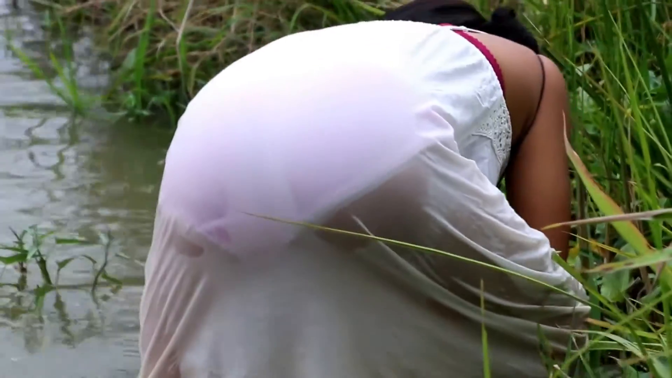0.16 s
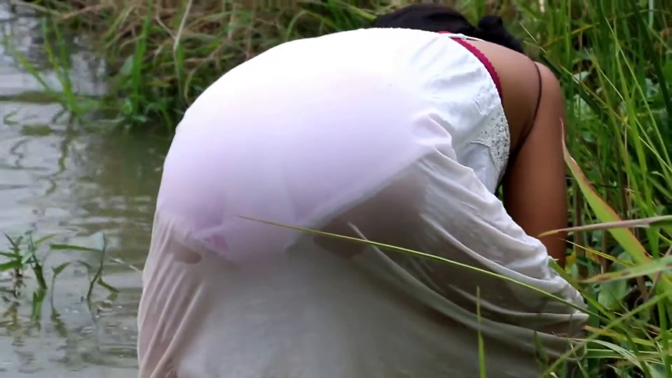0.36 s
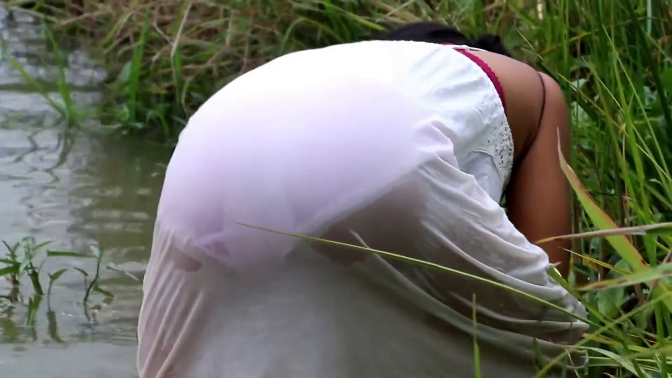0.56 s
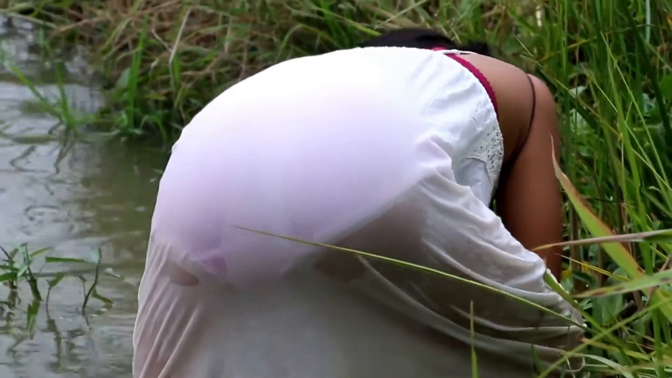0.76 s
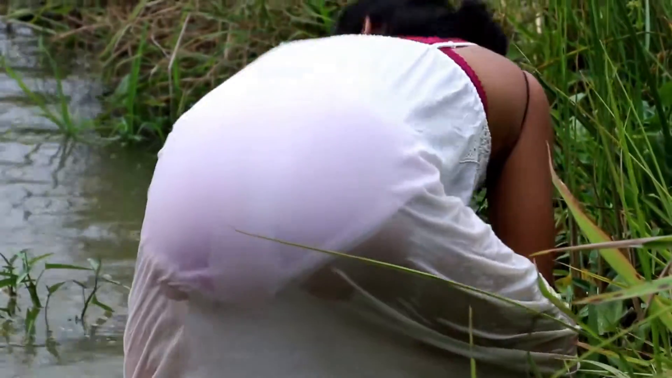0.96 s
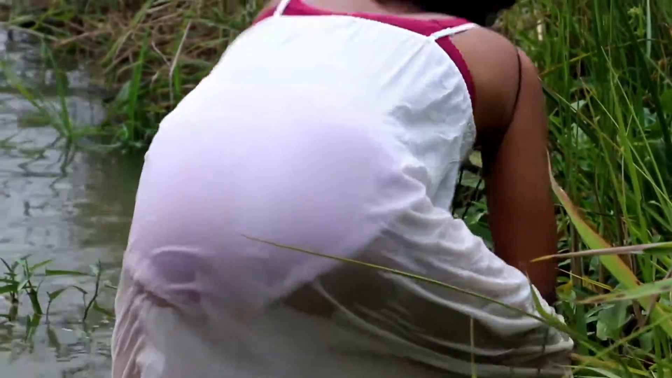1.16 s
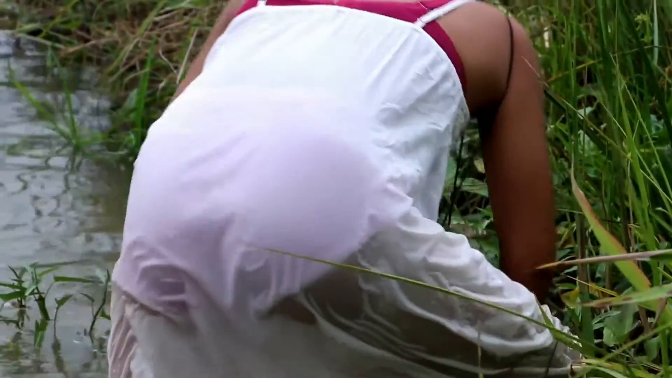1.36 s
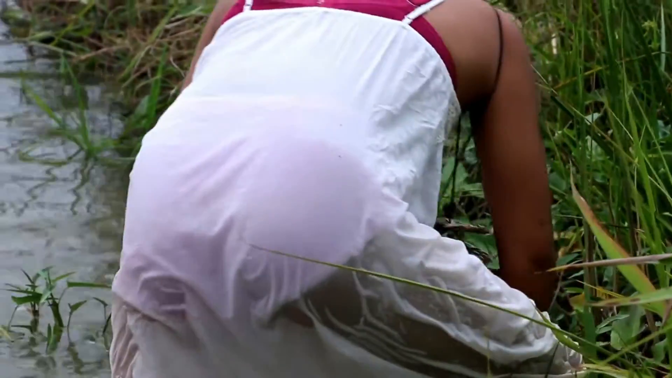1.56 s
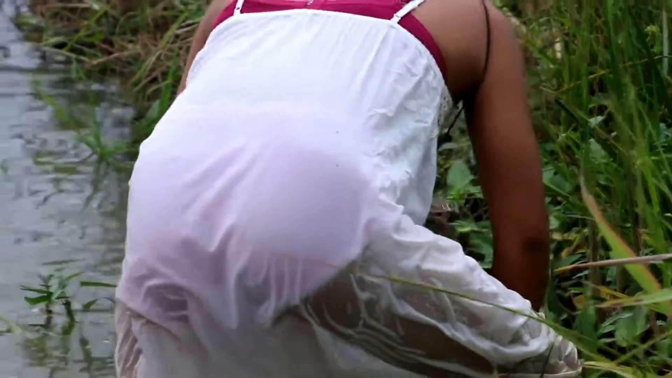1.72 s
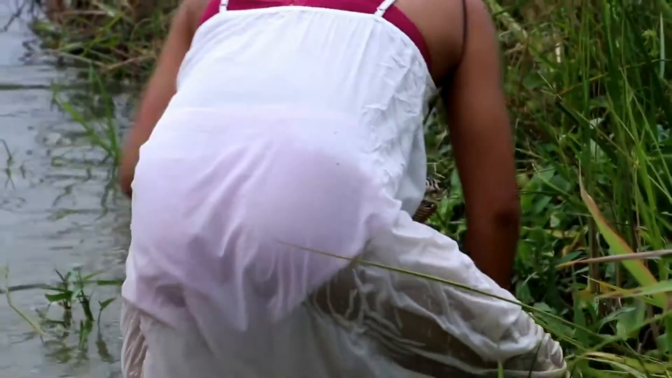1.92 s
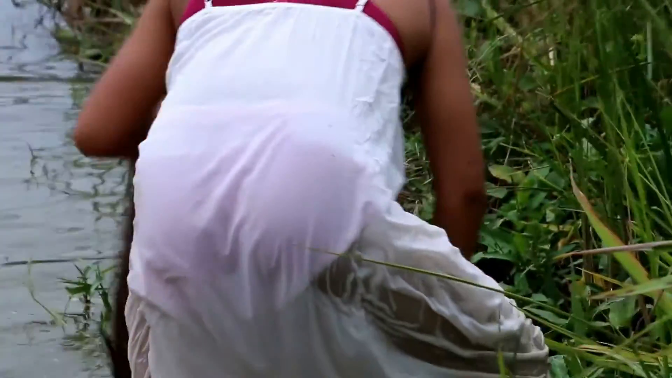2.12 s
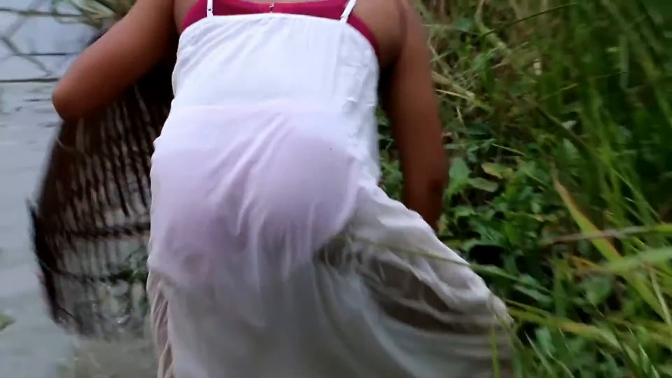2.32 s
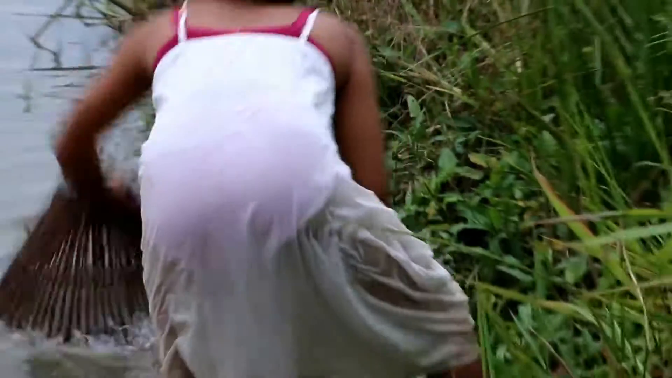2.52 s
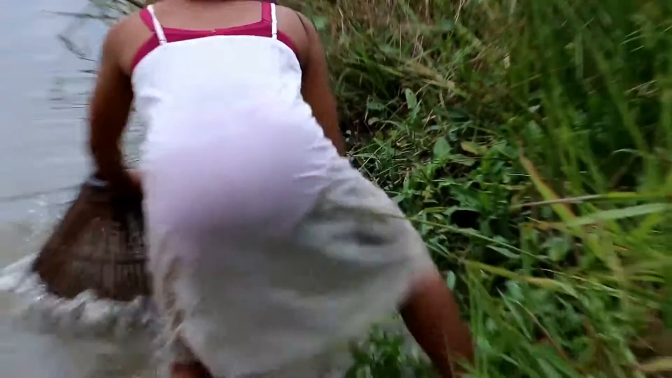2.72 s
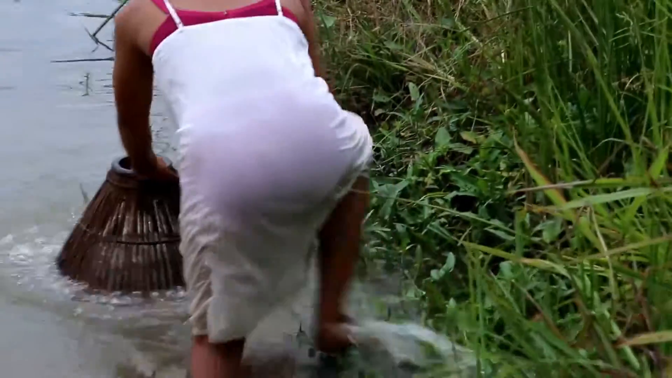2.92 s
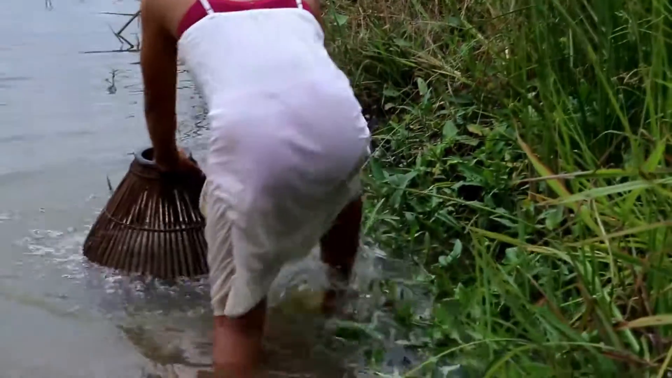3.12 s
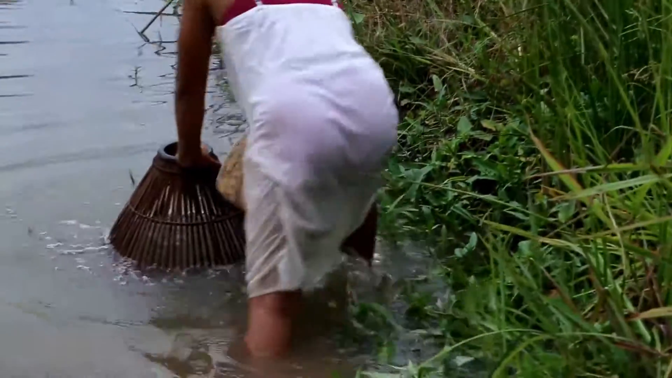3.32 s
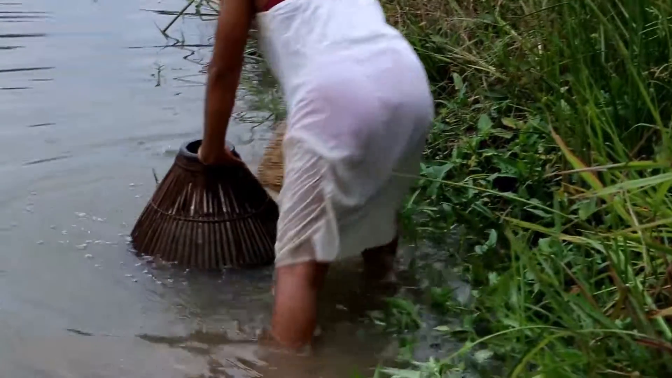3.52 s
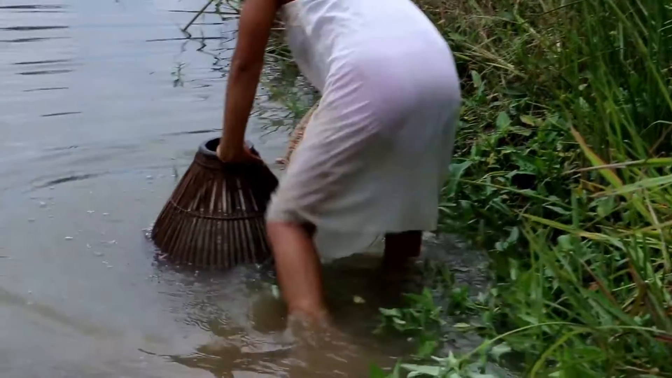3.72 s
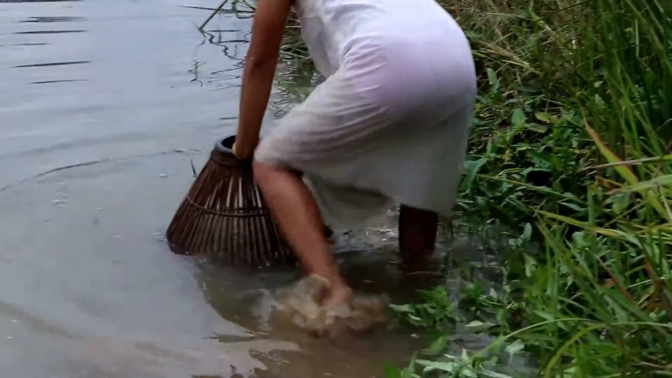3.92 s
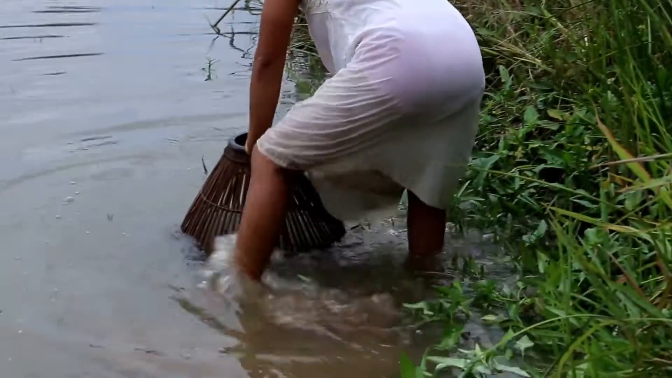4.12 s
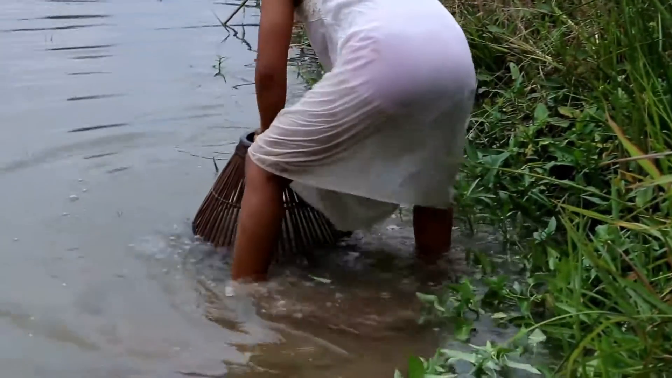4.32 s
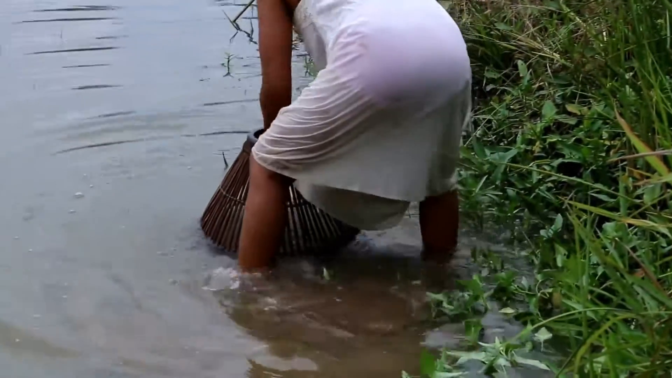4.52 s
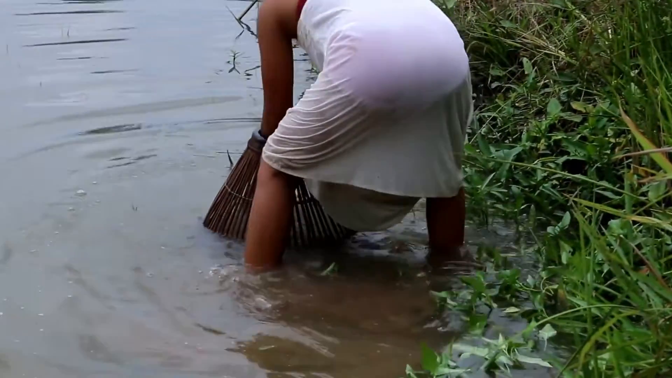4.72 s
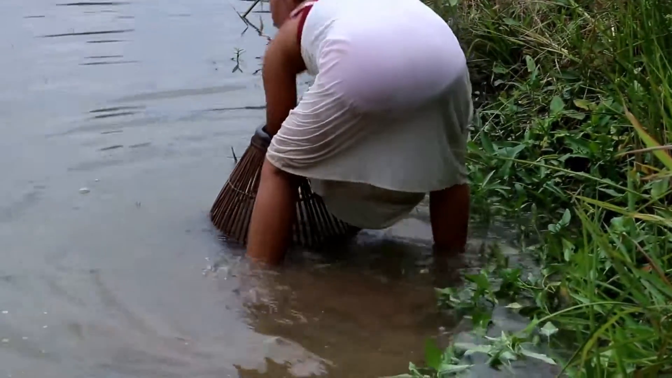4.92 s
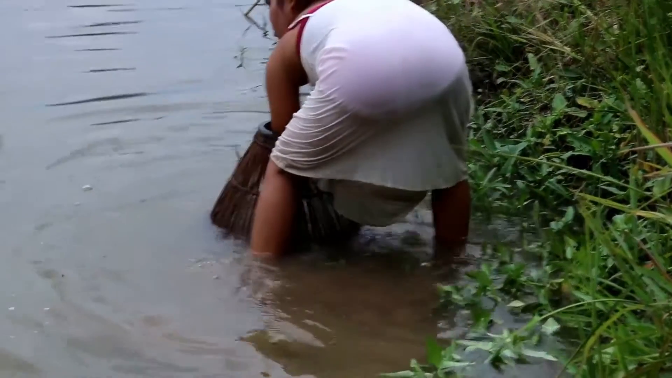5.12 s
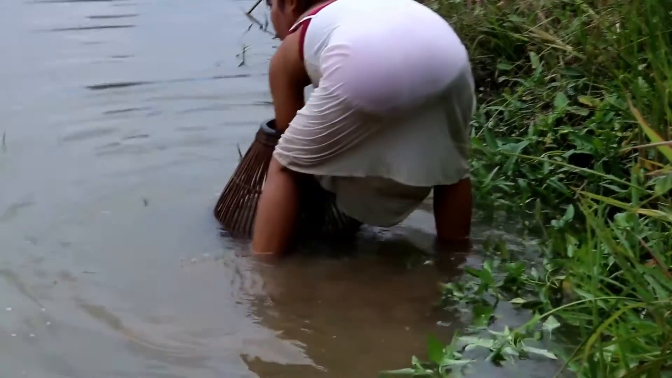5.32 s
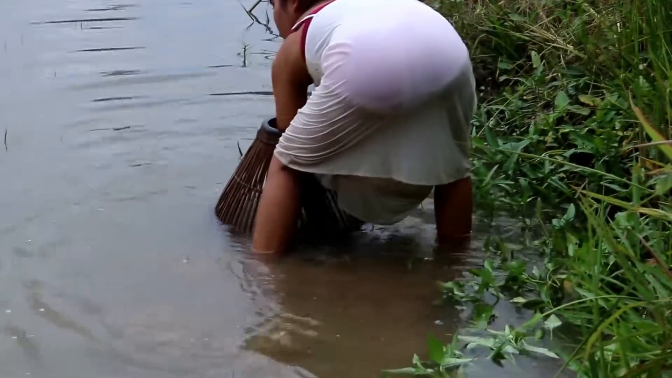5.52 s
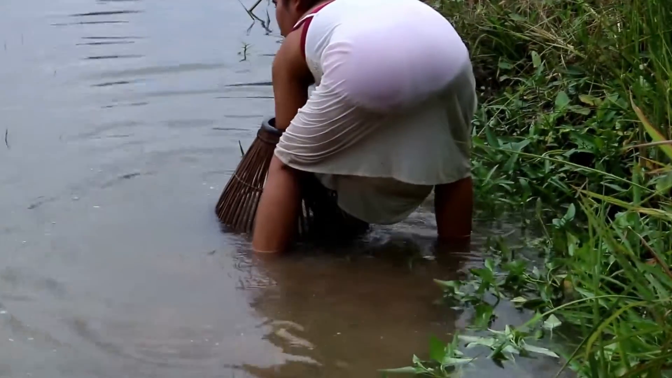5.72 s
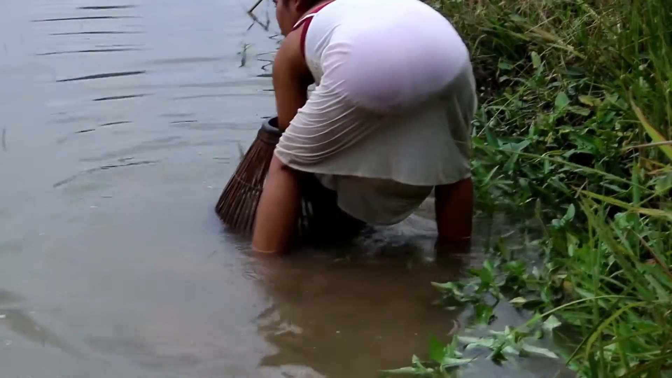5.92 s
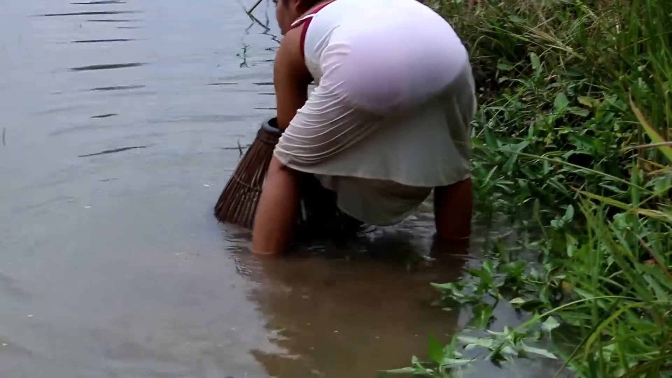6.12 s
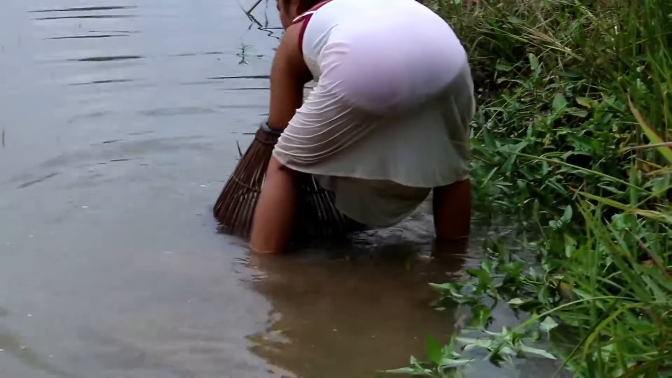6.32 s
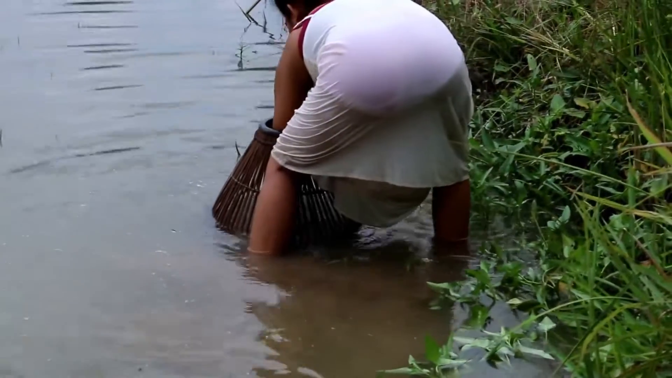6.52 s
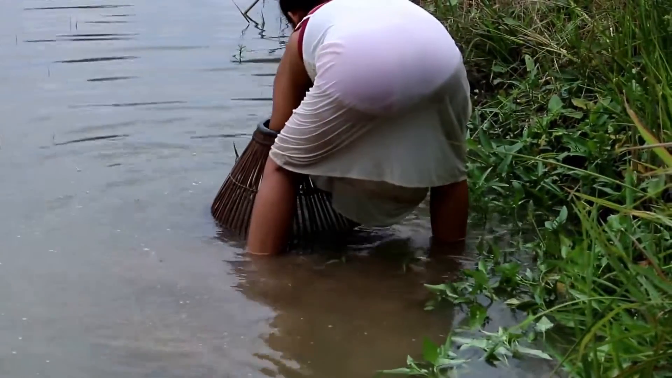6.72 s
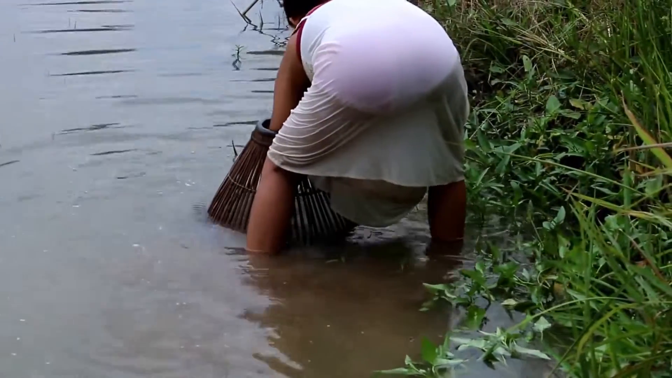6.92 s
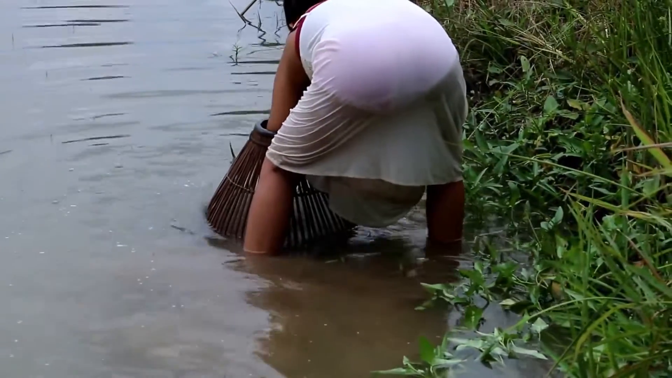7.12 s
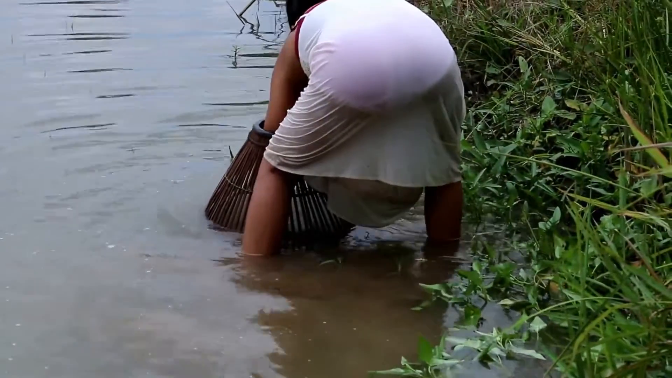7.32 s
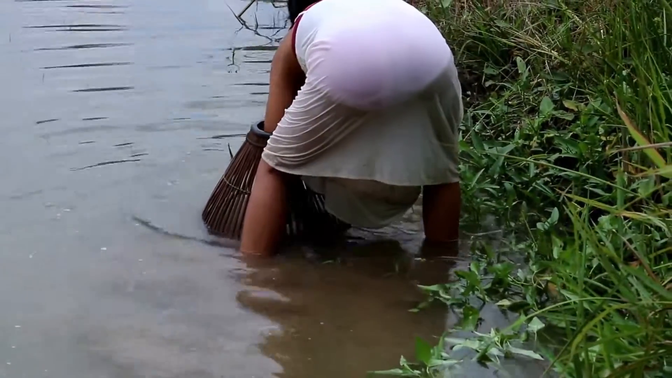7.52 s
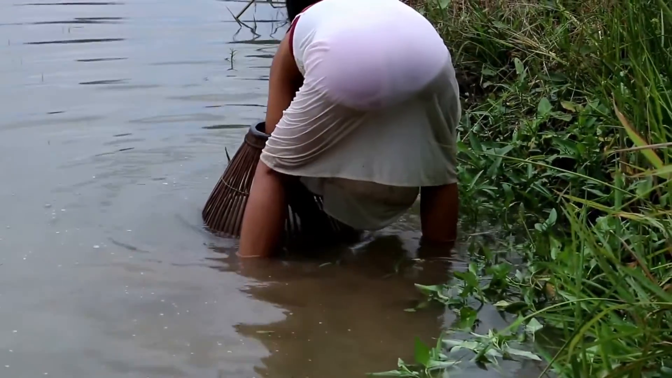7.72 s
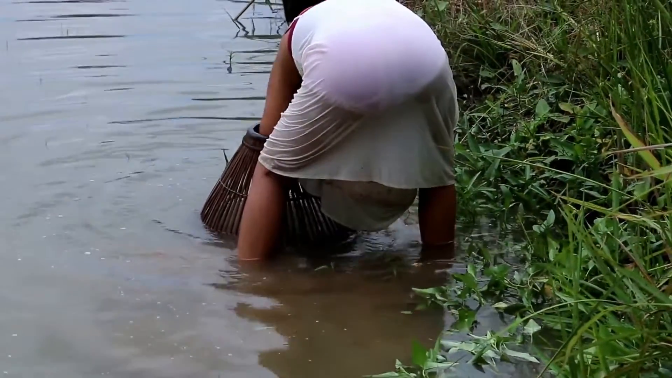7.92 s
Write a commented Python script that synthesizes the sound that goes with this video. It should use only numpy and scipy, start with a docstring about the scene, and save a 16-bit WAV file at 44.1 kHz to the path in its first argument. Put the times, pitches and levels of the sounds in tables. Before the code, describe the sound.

Someone wading at a grassy pond edge plunges a bamboo trap with splashes and a sharp wet slap, then quiet drips, over distant engine hum.

```python
"""First a bird scolds over far engines and a bush cricket's buzz, and single drips fall.
Then someone wading a grassy pond bank plunges a bamboo fish trap, takes two steps and gropes inside it.
Splashes are swarms of ringing bubbles with rushing noise; larger bubbles, gulps and clicks are placed singly.
Wind is low noise at each microphone port, engines are sine tones, and bird calls are sliding tones and rasps.
The bank answers the water and animals with a short, fading noise echo."""
import sys
import numpy as np
from scipy import signal
from scipy.fft import rfft, irfft, next_fast_len
from scipy.io import wavfile
from scipy.ndimage import uniform_filter1d, map_coordinates

SR = 44100
rng = np.random.default_rng(int(sys.argv[2]) if len(sys.argv) > 2 else 0)


def int16_out(signal):
    """Quantize to a 16-bit WAV file."""
    q = np.round(np.clip(np.atleast_2d(signal).T, -1, 1) * 32767)
    wavfile.write(sys.argv[1], SR, q.astype(np.int16))


N = 351036

# Sound levels are relative: panning, mixing and echo come later.
# A "_COLOUR" table shapes noise or bubble strength: frequency_hz, level_db (relative).
# A t60_s is the time a sound takes to fall by 60 dB.

# distant rumble and grass: colour; then time_s, level_db; then frequency_hz, left_right_likeness (0 to 1)
AIR_COLOUR = [(20, -19), (35, -17), (58, -3.5), (91, -2), (150, -1), (253, -10.5), (457, -21.5),
              (900, -22.5), (1600, -28), (2900, -28), (6050, -35), (9300, -31.5), (12000, -42.5),
              (15500, -46.5)]
AIR_LEVEL = [(0, -43.5), (5, -44.5), (7.96, -46.5)]
AIR_ALIKE = [(130, 0.96), (640, 0.7), (1400, 0.7), (3100, 0.037)]
# thin insect chorus
CHORUS_COLOUR = [(6500, -44), (7900, 14), (8700, 3), (9500, 13), (10400, -25), (13000, -26)]

# pump: time_s, firing_hz, level_db; its tones: multiple, level_db
PUMP = [(0, 86.7, -38), (2, 84.6, -41), (5.5, 86.72, -40.5), (7, 86.66, -41), (7.96, 87.2, -44.5)]
PUMP_ORDERS = [(1, 1.5), (2, -7.5), (3, -35), (4, -34.5)]
# slower far engine: time_s, shaft_hz, level_db; its tones: multiple, level_db
FAR_ENGINE = [(0, 34.9, -38.5), (2, 35.48, -48.5), (5, 34.7, -48), (7.96, 34.6, -48.5)]
FAR_ORDERS = [(4.5, -22.5), (5, -12), (6, -17.5), (7, -22.5), (8, -17.5), (9, -21.5)]

# breeze at the exposed left port: time_s, level_db
BREEZE = [(0, -52), (2.0, -38), (2.28, -23), (3.2, -27), (3.48, -33), (3.7, -21), (4.12, -23),
          (4.22, -29.5), (5.3, -32), (5.9, -43.5), (7.96, -58)]
SHELTER_DB = -9  # the right port lies in the lee
# puffs on the breeze: peak_s, length_s, level_db at the nearer port, left_minus_right_db
PUFFS = [(0.58, 0.038, -26, 17.5), (0.854, 0.11, -25.5, 26), (1.213, 0.021, -24, 22),
         (1.43, 0.091, -24.5, -22), (1.542, 0.024, -20.5, 14), (1.643, 0.099, -23.5, 1.5),
         (2.116, 0.11, -21.5, 7), (2.484, 0.17, -18.5, 27), (2.764, 0.061, -19.5, 22),
         (3.016, 0.051, -16, 5), (3.141, 0.19, -15.5, 29), (3.249, 0.064, -20.5, -19),
         (3.405, 0.018, -18.5, 7), (3.61, 0.15, -19.5, 11), (4, 0.047, -23, 24), (4.173, 0.045, -21, -22),
         (4.313, 0.054, -18.5, 24), (4.427, 0.15, -24, 1.5), (4.586, 0.085, -25, 3),
         (4.882, 0.11, -19.5, -1), (4.97, 0.02, -18, 3.5), (5.094, 0.076, -26, -22),
         (5.294, 0.059, -23.5, 25), (5.435, 0.094, -28.5, 20), (5.599, 0.046, -23.5, 11),
         (6.607, 0.085, -24.5, -9)]
PUFF_EDGE_DB = 7.5  # how far a puff has fallen at either end of its length
# low buffeting and smaller, brighter eddies
BUFFET_COLOUR = [(20, -15), (50, -5.5), (100, 4), (160, -1.5), (240, -14.5), (350, -34), (500, -39),
                 (900, -64), (2000, -100)]
EDDIES_COLOUR = [(80, -38), (180, 8), (300, -3), (420, -12.5), (600, -23), (1200, -42), (3000, -71)]
# sudden eddies thump the left port: start_s, level_db, pitch_hz
THUMPS = [(2.479, 1.5, 236), (2.569, -2.5, 262), (2.597, -7, 270), (3.124, 4.5, 302), (3.407, -14, 256),
          (3.606, 5, 262), (4.32, -2, 239)]

# bush cricket buzzes: start_s, end_s, level_db
BUZZES = [(-.15, 0.85, -67), (4.4, 5.4, -65.5), (6.9, 7.917, -66.5)]
CHIRP_SCATTER_HZ = 170  # size of the cricket's random pitch changes

# a bird's dry scolding: start_s, length_s, level_db
CHACKS = [(0.021, 0.022, -34.5), (0.105, 0.011, -39), (0.157, 0.0081, -36.5), (0.177, 0.0094, -40),
          (.3, 0.023, -35.5), (0.386, 0.009, -37.5), (.439, 0.0092, -39), (0.559, 0.022, -35),
          (0.645, 0.01, -40), (0.7, 0.0072, -38.5)]
CHACK_ATTACK_S, CHACK_RELEASE_S = .001, .006
RASP_COLOUR = [(1200, -28.5), (1800, -3.5), (2400, 1.5), (2700, 7), (3100, 5), (3600, -9.5), (4400, -10.5),
               (5200, -18.5), (8000, -47.5)]
# a run of short falling notes: start_s, start_hz, level_db
NOTES = [(1.436, 3100, -50), (1.742, 3060, -49.5), (2.01, 3030, -50), (2.205, 3050, -47),
         (2.399, 3070, -47), (3.567, 3740, -53), (3.802, 3760, -48.5), (4.027, 3700, -47),
         (4.222, 3540, -48), (4.424, 3520, -49), (4.645, 3430, -48.5), (4.848, 3400, -48.5),
         (5.055, 3390, -49.5), (5.276, 3380, -52.5), (5.473, 3380, -51), (5.697, 3350, -53)]
NOTE_S, NOTE_FALL, NOTE_BLUR = .052, .085, .7  # length, share of pitch lost, unsteadiness in radians
UNDERTONE, UNDERTONE_DB = .823, -8  # weaker partial below each note: pitch ratio, level
# lone slurred whistles: start_s, length_s, start_hz, end_hz, arch_height_hz, blur_radians, level_db
WHISTLES = [(4.552, .045, 3600, 3650, 100, 2, -51), (5.525, .135, 3600, 3450, 30, .6, -53),
            (5.512, .11, 3850, 3750, 290, .7, -54.5), (6.092, 0.08, 4100, 3700, 950, 2, -52),
            (6.08, .06, 3400, 3600, 350, 3, -56), (7.313, .075, 4250, 4100, 150, 3, -57),
            (7.34, 0.06, 3300, 3250, 0, 1.4, -55), (7.454, .095, 4000, 4050, 140, .6, -57),
            (7.555, .055, 3950, 3680, -30, .5, -53.5)]
# partials of one nasal chirp: multiple, level_db
CHIRP = [(1, 3), (2, 7), (3, -5.5)]

# echo life off the grassy bank: frequency_hz, t60_s
BANK = [(200, 0.0069), (2000, 0.16), (12000, 0.17)]
WATER_ECHO_DB, CALL_ECHO_DB, BUZZ_ECHO_DB = -9.5, -7, 3.5

# drops off the wet trap and clothes click on the surface: start_s, peak_db
CLICKS = [(1.885, -42), (1.98, -42), (4.465, -35), (4.488, -33), (4.844, -38), (4.865, -35), (5.04, -40),
          (5.257, -37), (5.75, -34), (5.788, -37), (6.701, -38), (6.79, -36), (7.061, -37), (7.494, -33),
          (7.66, -40), (7.696, -38)]
CLICK_T60_S = .012
TICKS_DB = -75  # stray droplets
TICKS_COLOUR = [(3000, 6), (9000, 1), (12000, 0), (15000, -12)]

# small drips: time_s, level_db
TRICKLE = [(0, -66), (2.5, -60), (3.3, -54), (3.7, -61), (4.4, -58), (5.4, -62), (6.3, -64), (7.1, -61),
           (7.96, -60)]
DRIPS_COLOUR = [(900, -11), (2200, -1.5), (3300, -4), (4500, -10), (7000, -19), (12000, -25)]
# soft gurgling under the small drips
GURGLE_DB = 1.5  # relative to the drips
GURGLES_COLOUR = [(500, -10), (900, -8.5), (1500, 2), (2300, -4.5), (3500, -3.5), (6000, -15)]

# cavities fill and their note slides: start_s, length_s, start_hz, end_hz, level_db
GULPS = [(3.424, 0.031, 774, 1390, -31.5), (3.604, 0.055, 500, 696, -42), (3.677, 0.036, 870, 1210, -46),
         (3.923, 0.033, 1100, 960, -43), (3.979, 0.033, 734, 900, -41), (6.45, 0.026, 515, 700, -46.5),
         (6.492, 0.047, 604, 830, -51), (6.714, 0.024, 1220, 1650, -46), (7.055, 0.039, 678, 900, -42),
         (7.189, 0.043, 660, 840, -41.5), (7.671, 0.054, 616, 1150, -41.5), (7.814, 0.025, 853, 1052, -44),
         (7.904, 0.066, 836, 910, -46)]
GULP_BLUR = .8  # unsteadiness of phase, radians

# single large bubbles and drips: start_s, level_db, pitch_hz
PLOPS = [(0.079, -32.5, 990), (0.521, -33.5, 1644), (0.746, -34, 1575), (0.804, -38, 1510),
         (0.835, -40, 1240), (0.867, -36, 900), (.9, -38, 2010), (.914, -36, 1550), (1.162, -35.5, 1360),
         (1.178, -39, 1900), (1.241, -41, 2020), (1.389, -35, 1200), (1.579, -34, 1800), (1.594, -33, 1000),
         (1.689, -38, 1190), (1.801, -37, 2100), (1.931, -38, 1500), (2.065, -33.5, 2070),
         (2.163, -30, 705), (2.173, -35.5, 2350), (2.443, -35, 1430), (2.606, -16, 820), (2.617, -24, 910),
         (2.668, -23, 674), (2.674, -24, 1930), (2.711, -34, 1190), (2.857, -19, 1220), (2.859, -27, 3200),
         (2.892, -23.5, 710), (2.891, -23, 1890), (2.984, -28, 4170), (3.007, -27, 2400),
         (3.011, -20.5, 1285), (3.072, -8.5, 807), (3.145, -26, 2050), (3.155, -27, 1840),
         (3.219, -16.5, 960), (3.428, -25.5, 926), (3.726, -37, 1000), (3.777, -38, 2080),
         (3.917, -24.5, 1096), (3.932, -27, 840), (3.944, -31, 2160), (4.004, -29, 670), (4.034, -29, 1830),
         (4.082, -26.5, 1770), (4.094, -22, 600), (4.096, -30, 1700), (4.11, -31, 740), (4.153, -28, 3040),
         (4.198, -26.5, 1030), (4.252, -22.5, 452), (4.254, -31, 1960), (4.322, -37, 1900),
         (4.671, -37, 2430), (4.699, -31, 820), (4.85, -32, 2750), (4.898, -30.5, 1520), (4.922, -38, 1900),
         (5.023, -30, 2940), (5.136, -37, 2460), (5.22, -38, 1930), (5.678, -29.5, 2030),
         (5.881, -34.5, 1000), (5.95, -27.5, 977), (6.12, -39, 2110), (6.17, -32, 1940),
         (6.255, -33.5, 3110), (6.328, -32, 976), (6.346, -36.5, 1630), (6.466, -39, 2180),
         (6.626, -42, 2140), (6.752, -39, 1510), (7.157, -39, 1260), (7.329, -32.5, 1020), (7.39, -41, 984),
         (7.489, -38, 1960), (7.517, -30, 2075), (7.54, -28.5, 1240), (7.563, -36.5, 960),
         (7.574, -30, 615), (7.684, -28, 740), (7.694, -25.5, 930), (7.704, -38.5, 1928),
         (7.802, -32.5, 1553), (7.882, -32.5, 2690), (7.946, -33.5, 910)]
PLOP_T60_S = .024
POP_DB, POP_T60_S = -11, .012  # the surface breaks as each bubble forms
SPATTER_DB, SPATTER_RISE_S, SPATTER_T60_S = -18, .001, .045  # wet smear around each bubble's note

# an air pocket slaps shut behind a foot: start_s, level_db
SLAP = [(3.2248, -13), (3.226, -2.8)]
# the pocket's ringing tones: pitch_hz, level_db, t60_s
POCKET = [(1240, -5, .018), (1750, -7, .01), (2550, -3, .006), (3150, -8, .012), (4910, -17, .018)]
SMACK_COLOUR = [(300, -5), (800, -4), (3300, -9), (6000, -27), (11000, -24.5), (15000, -42)]

# water churns between the slats of the plunging trap
CHURN_S, CHURN_LENGTH_S, CHURN_DB = 2.585, .098, -34.5
CHURN_COLOUR = [(300, -14), (480, -6), (750, 6), (1100, -15), (1500, -7), (3000, -42)]

# trap plunge, leg movements and groping hand: start_s, length_s, level_db
MOVES = [(2.571, .11, -35), (2.868, .13, -43), (2.999, .15, -40), (3.301, .2, -48), (3.914, .15, -43),
         (4.086, .04, -44), (4.176, .06, -46.5), (7.528, .19, -50.5)]
MOVE_RISE_S, MOVE_T60_S = .025, .25  # how fast the water is stirred up and falls back
AFTERWASH_DB, AFTERWASH_T60_S = -8, 1.7  # ripples that outlast each move
LAPPING_DB = -57  # the water at rest
# grass or cloth rustles as the trap is lifted (first two rows); then trap, feet and hands break the surface:
# start_s, level_db, t60_s, spray_db (relative to the row's own level)
SPLASHES = [(2.026, -47, .05, -2), (2.075, -49, .06, -1.5), (2.552, -33, .13, -4),
            (2.564, -26.5, .14, -4.5), (2.58, -25, .15, -4.5), (2.598, -28, .06, 1),
            (2.655, -30.5, .09, -12.5), (2.72, -47, .3, -0.5), (2.858, -36, .025, -4),
            (2.875, -37, .07, -3), (2.886, -35, .09, -10), (2.984, -44, .04, 7.5), (3.006, -36, .05, -5),
            (3.023, -37, .06, 2.5), (3.058, -35, .07, -6), (3.083, -35, .08, -4), (3.122, -29.5, .08, -9),
            (3.155, -35, .04, -6), (3.221, -28, .06, -14.5), (3.225, -17, .03, -12), (3.236, -38, .05, -6),
            (3.268, -30.5, .06, -11), (3.359, -45, .1, -1.5), (3.431, -40, .06, -1), (3.491, -45, .1, 0),
            (4.01, -39, .14, -9), (4.069, -40, .03, -2.5), (4.08, -34, .05, -4), (4.093, -31.5, .07, -5),
            (4.146, -43, .08, 2), (4.252, -32, .04, -8), (4.301, -46.5, .1, -5.5), (4.862, -40, .04, -0.5),
            (7.52, -42, .15, -15), (7.68, -43, .12, -13)]
SPLASH_RISE_S, RISE_GROWS = .007, 1.5  # rise for a t60 of .1 s, and the power by which it grows with t60
WATER_COLOUR = [(150, 1.5), (300, 10.5), (480, -4), (720, 7), (1200, 3.5), (1600, -5), (2100, 1),
                (2800, -5), (4000, -18), (6000, -7.5), (15000, -20)]
SPRAY_COLOUR = [(1500, -1), (3500, 6.5), (5000, -6), (8000, -5), (11000, -12), (14500, -19), (15700, -36)]
CLUMP_DB = 2.5  # how unevenly the clouds of bubbles are spread

TOP_HZ = 15650  # upper limit of the finished sound


def amp(db):
    """Turn decibels into gain."""
    return 10 ** (np.asarray(db) / 20)


def unit(x):
    """Scale to an rms (average strength) of 1."""
    return x / np.sqrt(np.mean(x ** 2) + 1e-20)


def clock():
    """Give the time of every sample in seconds."""
    return np.arange(N) / SR


def along(points, hz):
    """Read between (frequency, value) points on a log frequency axis."""
    f, v = np.transpose(points)
    return np.interp(np.log(hz + 1), np.log(f + 1), v)


def curves(rows):
    """Give one value per sample for each column after the time."""
    s, *cols = np.transpose(rows)
    return [np.interp(clock(), s, c) for c in cols]


def wobble(rate):
    """Draw a smooth random curve with rate knots a second."""
    knots = rng.standard_normal(4000)
    coarse = np.arange(0, N + 32, 32) / SR
    return np.interp(clock(), coarse, map_coordinates(knots, [coarse * rate], mode="wrap"))


def filtered(x, response):
    """Multiply the spectrum of x by a response that depends on frequency."""
    m = next_fast_len(N + 8192)
    return irfft(rfft(x, m) * response(np.fft.rfftfreq(m, 1 / SR)), m)[..., :N]


def noise(colour):
    """Make noise of rms 1 in the given colour."""
    return unit(filtered(rng.standard_normal(N), lambda hz: amp(along(colour, hz))))


def pan(db):
    """Give left and right gains for a left-minus-right level difference."""
    return amp(np.array([[.5], [-.5]]) * db)


def from_right(x, db, lag_ms):
    """A sound from the right reaches the left port later and weaker; a negative lag reverses the order."""
    lag_s = lag_ms / 1000 * np.array([[-.5], [.5]])
    return filtered(x, lambda hz: np.exp(2j * np.pi * hz * lag_s)) * pan(db)


def add(track, s, sound):
    """Mix a sound in at time s."""
    i = max(round(s * SR), 0)
    track[i:i + len(sound)] += sound[:max(N - i, 0)]


def air():
    """Distant rumble and grass share low sound between the ears; a thin insect chorus differs at each."""
    def spread(hz):
        turn = np.arccos(np.clip(along(AIR_ALIKE, hz), -1, 1)) / 2
        return amp(along(AIR_COLOUR, hz)) * [np.cos(turn), np.sin(turn)]

    mid, side = filtered(rng.standard_normal((2, N)), spread)
    rumble = from_right(unit(np.array([mid + side, mid - side])), db=-2.5, lag_ms=.11)
    chorus = np.array([noise(CHORUS_COLOUR) for _ in range(2)]) * pan(-6.5)
    rumble_level = amp(curves(AIR_LEVEL)[0] + 1.4 * wobble(33))
    return rumble_level * rumble + amp(-65 + wobble(.68)) * chorus


def engine(rows, orders, waver_db, drift_hz):
    """Each distant engine hums as a few steady tones at multiples of its speed, wavering on the way."""
    hz, db = curves(rows)
    phase = 2 * np.pi * np.cumsum(hz + drift_hz * wobble(3.086)) / SR
    out = np.zeros(N)
    for multiple, level in orders:
        gain = np.sqrt(2) * amp(db + level + waver_db * wobble(7.2))
        out += gain * np.sin(multiple * phase + rng.uniform(0, 2 * np.pi))
    return out


def hum():
    """A pump and a slower engine hum together, both off to the right."""
    pump = engine(PUMP, PUMP_ORDERS, waver_db=.5, drift_hz=.11)
    far = engine(FAR_ENGINE, FAR_ORDERS, waver_db=2, drift_hz=.145)
    return from_right(pump + far, db=-5.5, lag_ms=.21)


def gusts():
    """Wind level in dB at the left and right ports: rounded puffs add power to the breeze."""
    power = (amp(curves(BREEZE)[0]) * amp([[0], [SHELTER_DB]])) ** 2
    for s, length, db, side_db in PUFFS:
        t = np.arange(-1, 1, 1 / (2 * length * SR)) * 2 * length
        puff_db = db - PUFF_EDGE_DB * (2 * t / length) ** 2
        add(power[0], s + t[0], amp(puff_db + min(side_db, 0)) ** 2)
        add(power[1], s + t[0], amp(puff_db - max(side_db, 0)) ** 2)
    return 10 * np.log10(power)


def wind():
    """Puffs hit each port separately; the harder ones shed smaller, brighter eddies."""
    ports = []
    for db in gusts():
        rumble = amp(db - 3 + .23 * wobble(30)) * noise(BUFFET_COLOUR)
        # eddies grow faster than the wind level
        eddies = amp(-29 + 2.1 * (db + 18.5) + 5 * wobble(60)) * noise(EDDIES_COLOUR)
        ports.append(rumble + eddies)
    return np.array(ports)


def bubble(t, hz, t60, rise):
    """A ring dies away as its pitch climbs, like a bubble nearing the surface; negative rise lowers it."""
    age = t / t60
    ring = np.sin(2 * np.pi * hz * t * (1 + rise * np.minimum(age, 1) / 2))
    return ring * amp(-60 * age) * (1 - np.exp(-t * hz))


def thumps():
    """An eddy bursting on the left port gives a dull knock of a few cycles, falling in pitch."""
    out, t = np.zeros(N), np.arange(SR // 10) / SR
    for s, db, hz in THUMPS:
        add(out, s, amp(db) * bubble(t, hz, t60=.019, rise=-.55))
    return np.array([out, np.zeros(N)])


def cricket():
    """Each wing stroke is a short falling rasp; a buzz swells and stops dead."""
    t = clock()
    stroke = np.cumsum(108 + wobble(2.3)) / SR % 1  # about 108 strokes a second
    hz = 8650 - 1050 * stroke + CHIRP_SCATTER_HZ * wobble(110)
    phase = 2 * np.pi * np.cumsum(hz) / SR
    level = np.zeros(N)
    for start, end, db in BUZZES:
        level += amp(db) * np.clip((t - start) / .25, 0, 1) * np.clip((end - t) / .02, 0, 1)
    return level * unit(np.sin(np.pi * stroke) ** 4 * np.sin(phase + .54 * wobble(500)))


def glide(length, start_hz, end_hz, blur, arch_hz=0, overtones=((1, 0),)):
    """A sliding note swells and fades; its pitch may arch midway, and blur makes its phase unsteady."""
    u = np.arange(int(length * SR)) / (length * SR)
    unsteady = np.interp(u * length, np.arange(100) * .004, rng.standard_normal(100))
    hz = start_hz + (end_hz - start_hz) * u + arch_hz * np.sin(np.pi * u)
    phase = 2 * np.pi * np.cumsum(hz) / SR + blur * unsteady
    tone = sum(amp(db) * np.sin(k * phase) for k, db in overtones)
    return np.sin(np.pi * u ** .51) * tone


def birds():
    """One bird scolds in sudden noise rasps, others whistle short slurred notes, one chirps."""
    gate, song = np.zeros(N), np.zeros(N)
    for s, length, db in CHACKS:
        t = np.arange(int((length + CHACK_RELEASE_S / 2) * SR)) / SR
        attack = np.minimum(t / CHACK_ATTACK_S, 1)
        release = np.minimum((t[-1] - t) / CHACK_RELEASE_S, 1)
        add(gate, s, amp(db) * attack * release)
    partials = [(1, 0), (UNDERTONE, UNDERTONE_DB)]
    for s, hz, db in NOTES:
        note = glide(NOTE_S, hz, hz * (1 - NOTE_FALL), NOTE_BLUR, overtones=partials)
        add(song, s, amp(db) * note)
    for s, length, start_hz, end_hz, arch_hz, blur, db in WHISTLES:
        add(song, s, amp(db) * glide(length, start_hz, end_hz, blur, arch_hz))
    chirp = glide(.016, start_hz=1853, end_hz=1900, blur=1, overtones=CHIRP)
    add(song, 5.332, amp(-40.5) * chirp)
    return amp(-3.5) * gate * noise(RASP_COLOUR) + song


def bank(x):
    """The grassy bank scatters a short, diffuse echo: noise that dies at a rate set by pitch."""
    hz, t, z = signal.stft(rng.standard_normal((2, SR // 3)), SR, nperseg=256)
    fading = z * amp(-60 * t / along(BANK, hz)[:, None])
    tail = signal.istft(fading, SR, nperseg=256)[1]
    return signal.fftconvolve(x, tail / np.linalg.norm(tail[0]), axes=1)[:, :N]


def clumped(x, depth_db):
    """Clouds of bubbles come and go: a random gain over time and pitch."""
    z = signal.stft(x, nperseg=256)[2]
    field = uniform_filter1d(rng.standard_normal(z.shape), size=3, axis=0)
    field = uniform_filter1d(field, size=4, axis=1)
    return signal.istft(z * amp(depth_db * unit(field)), nperseg=256)[1][:N]


def froth(level, colour, low_hz, high_hz, cycles, spread_db, hiss, width_db, count, size):
    """Stereo swarm of bubbles over a rush: livelier water makes both more and louder ones."""
    density = level / level.sum()
    place, tone, life, side = rng.random((count, 4)).T
    at = np.minimum(np.searchsorted(np.cumsum(density), place), N - 1)
    hz = low_hz * (high_hz / low_hz) ** tone
    t60 = cycles * (.5 + life) / hz
    extra_db = spread_db * np.minimum(rng.exponential(size=count), 3)
    strength = amp(along(colour, hz) + extra_db) * np.sqrt(hz)
    rings = bubble(np.arange(size) / SR, hz[:, None], t60[:, None], rise=.23)
    # equalise ring energy, then follow the water's level
    gain = unit(strength) / np.linalg.norm(rings, axis=1)
    gain *= level[at] / np.sqrt(count * density[at])
    rings *= gain[:, None]
    where = (at[:, None] + np.arange(size)).ravel()
    sides = pan(width_db * (side - .5))
    swarm = np.array([np.bincount(where, (rings * g[:, None]).ravel(), N)[:N] for g in sides])
    # the rush comes from a broad patch of water, so left and right differ a little
    middle = unit(clumped(noise(colour), depth_db=CLUMP_DB))
    difference = np.array([[1], [-1]]) * amp(width_db - 32) * noise(colour)
    rush = level * unit(middle + difference) * amp(1.8 * wobble(160) - .5)
    return np.sqrt(1 - hiss) * swarm + np.sqrt(hiss) * rush


def ticks():
    """Droplets land with tiny dry clicks: a few near ones over a faint random patter."""
    near, t = np.zeros(N), np.arange(SR // 32) / SR
    snap = noise(TICKS_COLOUR)
    for s, db in CLICKS:
        click = snap[round(s * SR):][:len(t)] * amp(-60 * t / CLICK_T60_S)
        add(near, s, amp(db) * click / np.abs(click).max())
    patter = froth(np.full(N, amp(TICKS_DB)), TICKS_COLOUR, low_hz=4000, high_hz=14000, cycles=6,
                   spread_db=2, hiss=0, width_db=12, count=200, size=100)
    return near * pan(-2.3) + patter


def gurgling():
    """Water stirs softly around the legs and inside the trap: many slow, overlapping bubbles."""
    level = amp(curves(TRICKLE)[0] + GURGLE_DB + 2.5 * wobble(9))
    bubbles = froth(level, GURGLES_COLOUR, low_hz=550, high_hz=3400, cycles=70,
                    spread_db=2, hiss=.15, width_db=5, count=900, size=2600)
    return from_right(bubbles, db=-4, lag_ms=.08)


def gulps():
    """Water runs into hollows left by the trap, legs and hands; their notes mostly slide upward."""
    out = np.zeros(N)
    for s, length, start_hz, end_hz, db in GULPS:
        add(out, s, amp(db) * glide(length, start_hz, end_hz, GULP_BLUR))
    return out * pan(-1.6)


def plops():
    """Drips and trapped air: a pop, one clear bubble, and a wet spatter around its own pitch."""
    out, t = np.zeros(N), np.arange(SR // 8) / SR
    pop = amp(POP_DB - 60 * t / POP_T60_S)
    spatter = (1 - np.exp(-t / SPATTER_RISE_S)) * amp(SPATTER_DB - 60 * t / SPATTER_T60_S)
    for s, db, hz in PLOPS:
        band = signal.butter(3, [.68 * hz, 1.65 * hz], "bandpass", fs=SR)
        wet = unit(signal.lfilter(*band, rng.standard_normal(len(t))))
        ring = bubble(t, hz, PLOP_T60_S, rise=.18)
        add(out, s, amp(db) * (.95 * ring + (pop + spatter) * wet))
    return from_right(out, db=-4, lag_ms=.073)


def slap():
    """The hollow behind a foot closes with a sharp, wet smack: ringing air plus fading noise."""
    out, t = np.zeros(N), np.arange(SR // 16) / SR
    ring = sum(amp(db) * bubble(t, hz, t60, rise=.043) for hz, db, t60 in POCKET)
    smack = noise(SMACK_COLOUR)
    for s, db in SLAP:
        wet = smack[round(s * SR):][:len(t)] * amp(-60 * t / .022)
        add(out, s, amp(db) * (.7 * ring + .25 * wet))
    return out * pan(-2.4)


def churn():
    """The trap drags air under: a dense, low boil that stops when the rim meets the mud."""
    t = clock() - CHURN_S
    rise = np.clip(t / .015, 0, 1)
    fall = np.clip((CHURN_LENGTH_S - t) / .015 + 1, 1e-4, 1)
    level = amp(CHURN_DB) * rise * fall + 1e-8
    boil = froth(level, CHURN_COLOUR, low_hz=400, high_hz=1600, cycles=18,
                 spread_db=1, hiss=.5, width_db=3, count=160, size=1300)
    return boil * pan(-2)


def wash():
    """Power of the stirred water: each move swells, holds and falls back, leaving ripples."""
    t, power = clock(), amp(LAPPING_DB) ** 2
    for s, length, db in MOVES:
        swell = np.clip((t - s) / MOVE_RISE_S, 0, 1)
        after = np.maximum(t - s - length, 0)
        ripples_db = AFTERWASH_DB - 60 * after / AFTERWASH_T60_S
        fall_db = np.maximum(-60 * after / MOVE_T60_S, ripples_db)
        power = power + (swell * amp(db + fall_db)) ** 2
    return power


def splashing():
    """After a brief rustle, splashes swell and die over the wash; spray crackles, and the wet trap drips."""
    body = wash()
    spray = body * amp(-9.5) ** 2
    t = np.arange(SR // 3) / SR
    for s, db, t60, spray_db in SPLASHES:
        rise = SPLASH_RISE_S * (10 * t60) ** RISE_GROWS
        fall_db = -60 * np.maximum(t - rise, 0) / t60
        power = (np.minimum(t / rise, 1) * amp(db + fall_db)) ** 2
        add(body, s, power)
        add(spray, s, power * amp(spray_db) ** 2)
    bubbles = froth(np.sqrt(body), WATER_COLOUR, low_hz=280, high_hz=5000, cycles=32,
                    spread_db=4.5, hiss=.2, width_db=5, count=3200, size=1100)
    crackle = froth(np.sqrt(spray), SPRAY_COLOUR, low_hz=3260, high_hz=14000, cycles=6,
                    spread_db=1.8, hiss=.6, width_db=20, count=5000, size=160)
    drips = froth(amp(curves(TRICKLE)[0]), DRIPS_COLOUR, low_hz=976, high_hz=12600, cycles=41,
                  spread_db=3.5, hiss=.06, width_db=11.5, count=1000, size=800)
    crackle = from_right(crackle, db=-2.7, lag_ms=-.014)
    drips = from_right(drips, db=-10.5, lag_ms=.15)
    return bubbles * pan(-.97) + crackle + drips


def scene():
    """Mix the near water with farther wildlife, their echo, hum and wind."""
    water = splashing() + churn() + gurgling() + ticks() + plops() + gulps() + slap()
    calls = from_right(birds(), db=-6.5, lag_ms=.075)
    buzz = from_right(cricket(), db=-11.5, lag_ms=.098)
    echo = bank(amp(WATER_ECHO_DB) * water + amp(CALL_ECHO_DB) * calls + amp(BUZZ_ECHO_DB) * buzz)
    return water + calls + buzz + echo + hum() + air() + wind() + thumps()


def record(dry):
    """Keep only the sound below the band limit."""
    return filtered(dry, lambda hz: hz < TOP_HZ)


dry = scene()
out = record(dry)
int16_out(out)
```